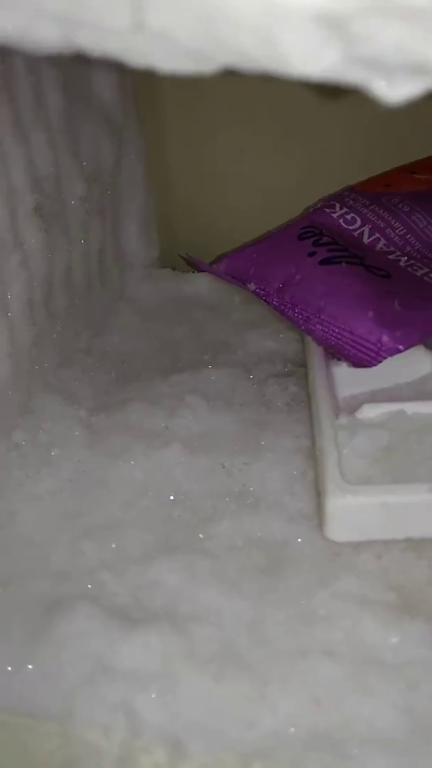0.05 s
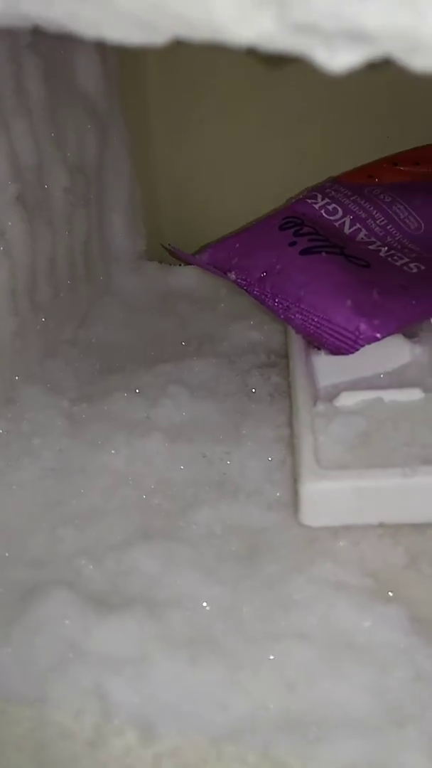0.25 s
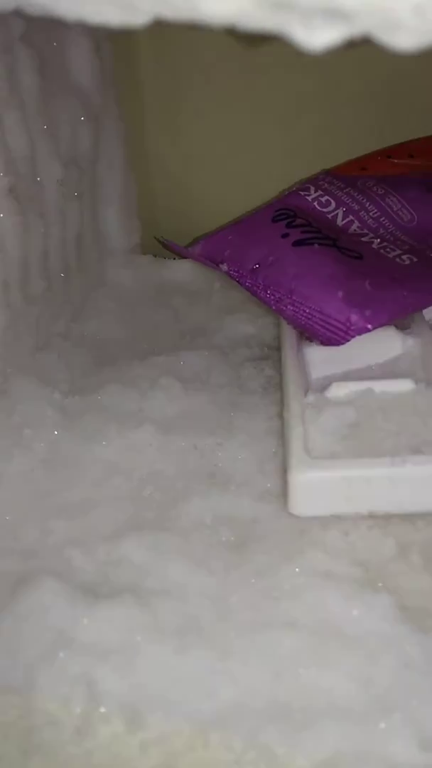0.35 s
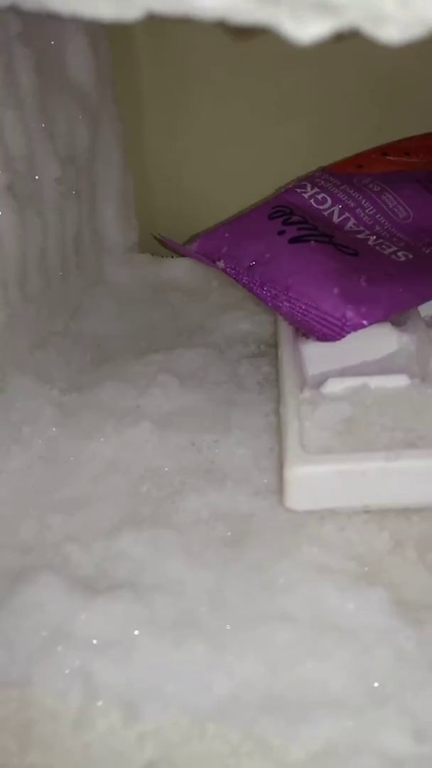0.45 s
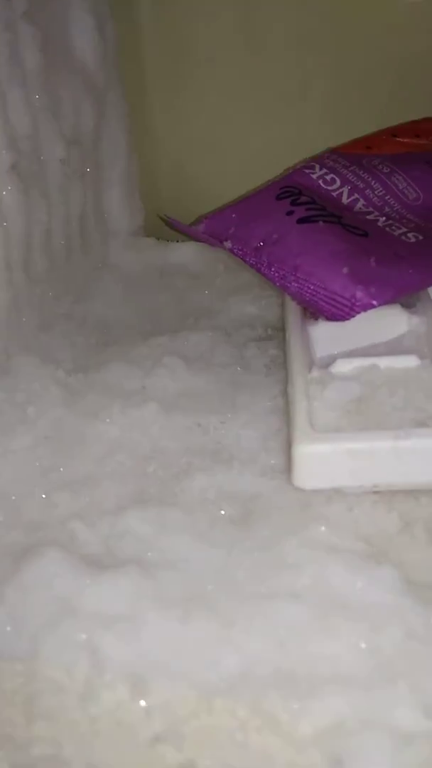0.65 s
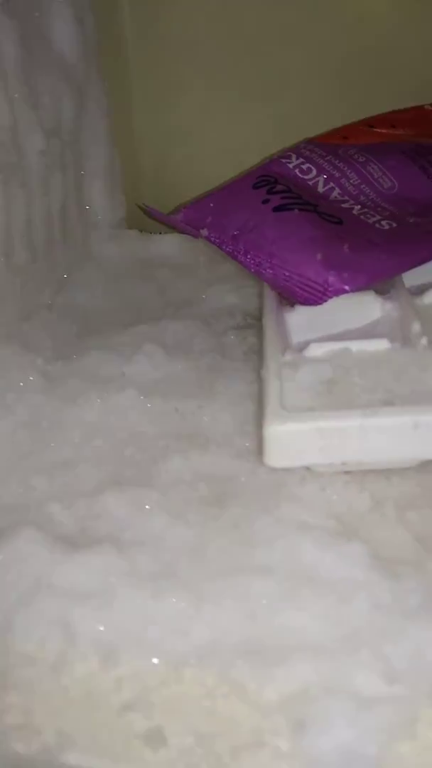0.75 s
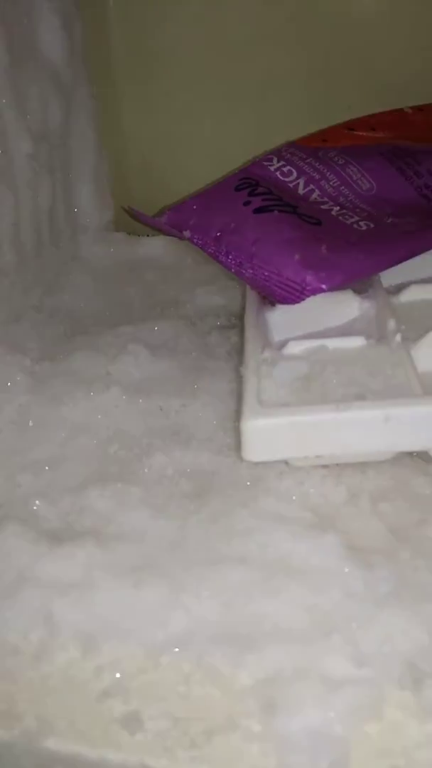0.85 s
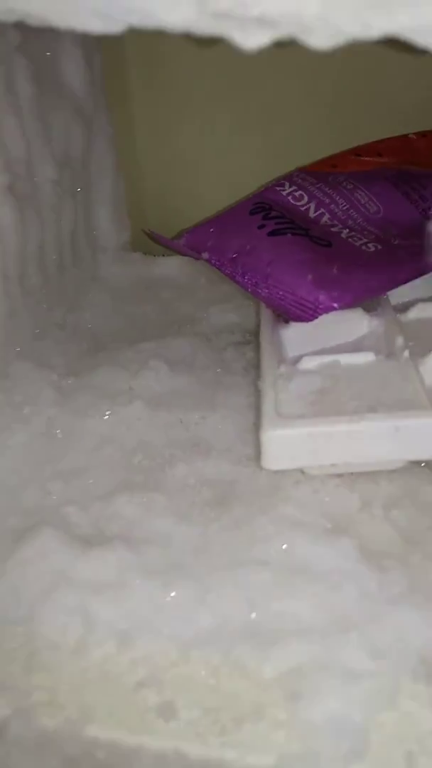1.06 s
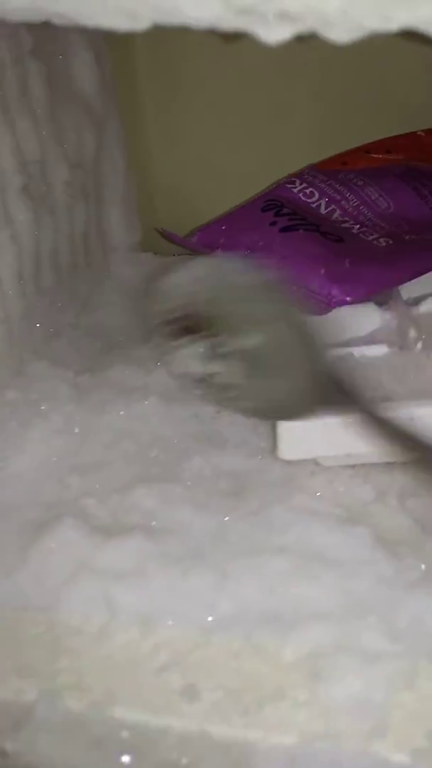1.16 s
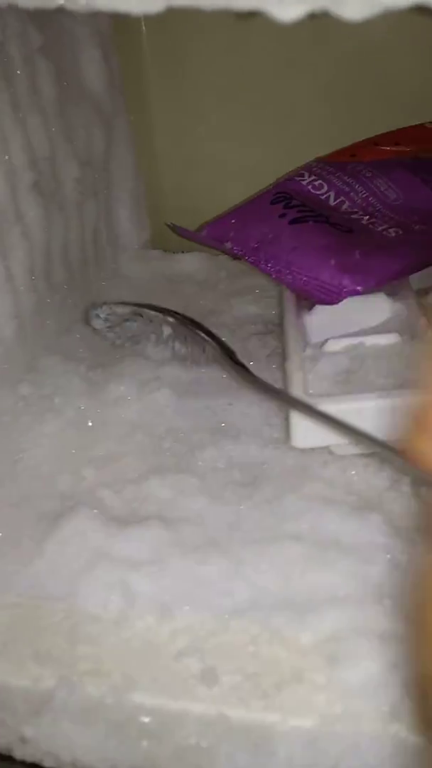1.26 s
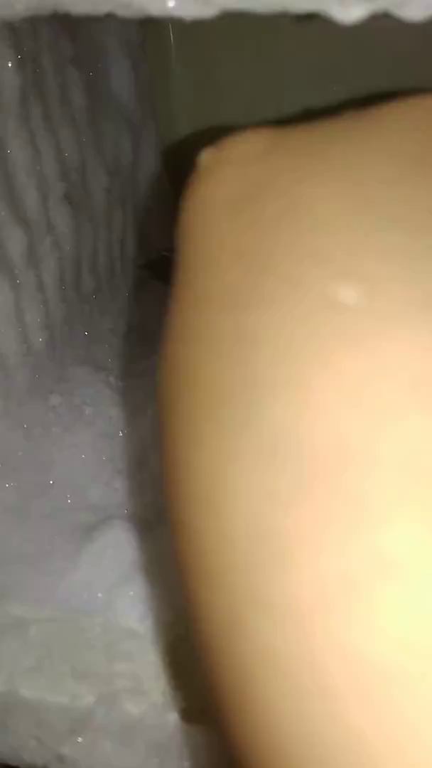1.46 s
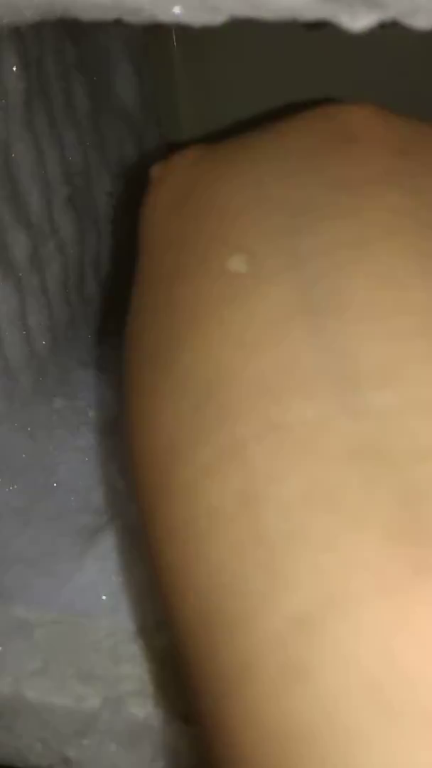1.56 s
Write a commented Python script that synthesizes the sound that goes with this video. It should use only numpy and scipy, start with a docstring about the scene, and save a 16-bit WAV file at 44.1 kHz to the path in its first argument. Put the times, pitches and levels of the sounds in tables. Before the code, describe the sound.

A metal spoon scrapes crumbling frost inside a freezer, knocking the hollow wall and thumping the cabinet. After a brief pause, the ice snaps with two sharp clicks and a soft bump follows. Heard close, over a faint compressor hum.

```python
"""Inside a freezer compartment, a metal spoon works at the frost, close by. Ice crystals crumble and squeak
under it. The spoon shakes and knocks the hollow liner (the inner wall) and makes the cabinet thump. The frost
snaps with two sharp clicks, then come a last soft bump and a faint, soft hiss. The compressor hums faintly
underneath."""
import sys
import numpy as np
from scipy import signal
from scipy.fft import rfft, irfft
from scipy.io import wavfile

SR = 44100
rng = np.random.default_rng(int(sys.argv[2]) if len(sys.argv) > 2 else 0)


def log_audio(samples):
    """Write samples as a 16-bit WAV file to the path given in sys.argv[1]."""
    # one column per channel
    frames = np.atleast_2d(samples).T
    # limit to full scale, then quantise
    limited = np.clip(frames, -1, 1)
    pcm = np.round(limited * 32767).astype(np.int16)
    wavfile.write(sys.argv[1], SR, pcm)


N = 70560
T = np.arange(N) / SR
FREQS = np.maximum(np.arange(N // 2 + 1) * SR / N, 1)

# How each sound swells and fades. Each row: time in seconds, level in dB.
SCRAPE_LEVELS = [(0, -64), (.08, -57), (.16, -57.5), (.185, -38.5), (.225, -42.5), (.25, -44),
                 (.295, -41.5), (.318, -80), (.335, -43), (.36, -62), (.40, -61), (.47, -50.5),
                 (.58, -48.5), (.62, -74), (.645, -52), (.71, -46.5), (.775, -59.5), (.805, -45),
                 (.835, -100), (1.0, -82.5), (1.1, -104), (1.33, -74.5), (1.37, -48.5), (1.42, -69),
                 (1.6, -100.5)]
DRAG_LEVELS = [(0, -53.5), (.1, -74.5), (.165, -47.5), (.185, -47), (.24, -45), (.29, -35), (.32, -49.5),
               (.39, -50), (.47, -50), (.52, -31.5), (.57, -38.5), (.69, -49), (.80, -43.5), (.88, -53.5),
               (1.0, -76), (1.34, -70.5), (1.39, -47), (1.6, -77)]
RUMBLE_LEVELS = [(0, -50.5), (.13, -85), (.21, -41), (.33, -37), (.40, -49.5), (.48, -52), (.53, -34.5),
                 (.68, -47.5), (.80, -36), (.92, -50.5), (1.05, -55.5), (1.34, -64), (1.38, -39),
                 (1.45, -46), (1.6, -66)]
HISS_LEVELS = [(1.38, -85), (1.43, -61), (1.5, -65.5), (1.56, -64.5), (1.6, -67)]
HUM_LEVELS = [(0, -70), (0.152, -82), (0.223, -56.5), (.95, -53.5), (1.1, -47), (1.218, -53), (1.33, -66),
              (1.498, -47), (1.6, -60)]

# The tone colour of each noise. Each row: frequency in Hz, relative level in dB.
SCRAPE_COLOUR = [(300, -6), (1000, 0.5), (1900, 3), (3500, 7), (6000, 3.5), (8000, 8), (12000, 5.5),
                 (15500, 1.5)]
DRAG_COLOUR = [(150, -8), (260, -1), (400, 5), (620, -3.5), (950, -14), (1300, -6), (2000, -10),
               (5000, -37.5)]
RUMBLE_COLOUR = [(20, -37), (45, -10.5), (75, -24.5), (110, 3.5), (170, 1), (215, -16), (400, -25),
                 (1000, -75.5)]
CRUNCH_COLOUR = [(200, 7.5), (500, -3.5), (1500, 3), (2600, -4), (4300, -6), (8000, -18.5), (16000, -35)]
CRACK_COLOUR = [(300, -6), (1000, -1), (2300, 7.5), (4800, -4), (6700, -4), (9500, -2.5), (13500, -7),
                (15200, -7.5), (17000, -27.5)]
TAIL_COLOUR = [(300, 10.5), (2500, 2.5), (6000, -8.5), (10000, -7), (15000, -19.5)]
HISS_COLOUR = [(1000, -2), (2600, -0.5), (3500, -9), (4500, 3), (6300, 4), (7400, -15), (10000, -27.5),
               (16000, -33)]
ROOM_COLOUR = [(20, 6.5), (100, 8.5), (280, -27), (550, 5.5), (900, -30.5), (3000, -19.5), (8000, -44.5),
               (16000, -50.5)]

# Knocks on the liner. Each row: start in seconds, level in dB, treble cut in Hz, bass cut in Hz.
KNOCKS = [(0.1745, -26.5, 794, 600), (.251, -23.5, 644, 450), (.272, -50, 3020, 400),
          (0.278, -23.5, 556, 357), (0.283, -29, 2660, 345), (0.29, -23, 510, 261), (.299, -22, 3900, 650),
          (0.479, -16.5, 720, 764), (0.4858, -16, 4600, 1340), (0.496, -11, 520, 294),
          (0.5035, -6.5, 2600, 540), (.726, -26.5, 596, 200), (.748, -29.5, 475, 220),
          (0.802, -36, 1980, 300), (1.357, -38, 642, 624), (1.398, -34, 4500, 1476)]
# The pitches the liner rings at, in Hz.
LINER_HZ = [340, 389, 485, 536, 602, 724, 795, 855, 986, 1098, 1266, 1321, 1590, 1693, 1891]
# One row for each of those pitches: level in dB, fade time (to fall 60 dB) in seconds.
LINER_RINGS = [(-20.5, 0.12), (-12.5, 0.17), (-16, 0.16), (-19.5, 0.072), (-15, 0.11), (-15.5, 0.11),
               (-23, 0.13), (-20, 0.16), (-24, 0.043), (-23.5, 0.15), (-16, 0.086), (-21.5, 0.08),
               (-16.5, 0.12), (-16, 0.09), (-17.5, 0.071)]
# The contact's clack and the cabinet's boom. Each row: pitch in Hz, level in dB, fade in seconds.
CLACK_TONES = [(391.1, 1, 0.055), (650, -6, 0.019), (1294, -8.5, 0.015), (1839, -3, 0.03)]
CABINET_TONES = [(62.4, -9, 0.16), (114.6, 9, 0.022), (127, -7, 0.27), (147.2, -4.5, 0.08), (167, 4, 0.15)]
# Cabinet thumps. Each row: start in seconds, level in dB.
THUMPS = [(0.293, -44), (0.5, -29), (0.7225, -23.5), (0.746, -53), (1.371, -36), (1.415, -31.5)]
# Frost cracks. Each row: start in seconds, level in dB, fade in seconds, bass cut in Hz,
# extra lean to the left in dB.
CRACKS = [(0.012, -38.5, 0.05, 2010, -1), (0.27, -25.5, 0.019, 1520, 4), (0.285, -26.5, 0.019, 1370, 5),
          (0.299, -29.5, 0.019, 935, 2), (.340, -29, 0.029, 1210, 1), (0.4863, -22, 0.011, 1300, 2),
          (0.504, -27, 0.012, 1015, 10), (0.525, -29.5, 0.015, 4000, -5), (0.58, -34.5, 0.027, 2000, -1),
          (0.638, -34.5, 0.015, 3330, 1), (.728, -24, 0.027, 3000, 0.5), (0.741, -40, 0.025, 5940, 16),
          (0.7504, -22.5, 0.019, 4050, 7), (0.752, -30, 0.027, 1500, 5.5), (0.789, -47.5, 0.036, 3020, 4),
          (0.81, -45, 0.02, 2500, 0), (0.8456, -43.5, 0.023, 3480, 10), (.906, -34.5, 0.03, 2500, 5.5),
          (1.172, -18, 0.028, 2720, -4), (1.22, -28.5, 0.039, 5600, 1), (1.247, -14.5, 0.033, 3700, -1),
          (1.251, -27.5, 0.043, 823, 0), (1.36, -38.5, 0.092, 5460, -13), (1.398, -40, 0.03, 3970, 1)]
# Where the cracks ring. Each row: frequency in Hz, width in Hz, boost in dB.
CRACK_PEAKS = [(2250, 100, -2), (3460, 300, 0.5), (6700, 230, 5), (7800, 2100, 5), (9930, 320, 2.5),
               (11800, 900, 4.5)]
# Pings of ice and spoon. Each row: start in seconds, pitch in Hz, level in dB, fade in seconds,
# pitch slide in Hz.
PINGS = [(.505, 8200, -57, 0.04, 7), (.731, 1830, -34.5, .04, 5.5), (.799, 4450, -43, 0.059, 3),
         (.801, 1832, -42.5, .07, 3), (.808, 5600, -41, 0.026, 0), (.906, 2870, -45.5, 0.059, 3),
         (.906, 6520, -39.5, 0.027, 0), (.906, 4980, -42, 0.028, 2), (1.172, 1950, -40.5, 0.16, 620),
         (1.173, 6280, -30.5, 0.057, -2.5), (1.172, 10490, -25, 0.034, -1), (1.22, 9530, -45.5, .035, 1),
         (1.248, 6650, -33, 0.024, 1.5), (1.398, 2470, -41, 0.041, 0), (1.365, 1726, -42.5, .04, 0),
         (1.399, 1635, -39, 0.049, 0)]
# Brief tones: squeaks of frost and short low pulses of the knocks.
# Each row: middle and length in seconds, pitch in Hz, level in dB.
BRIEF_TONES = [(.125, .09, 1930, -60), (.186, .018, 780, -41), (.205, .04, 590, -48),
               (.224, .034, 8250, -39), (.225, .035, 7200, -48), (.257, .014, 530, -38),
               (.29, .03, 395, -33), (.29, .035, 11600, -42), (.484, .007, 800, -31),
               (.4988, .004, 600, -15), (.529, .005, 5600, -31), (.744, .005, 7400, -35),
               (1.361, .011, 500, -40), (1.367, .01, 8280, -40), (1.369, .01, 11700, -46)]
# The compressor's faint steady tones. Each row: pitch in Hz, level in dB.
HUM_TONES = [(151, -86), (484.5, -71), (581.5, -95.5), (630, -74.5)]
# Where sounds sit between the ears. Each row: frequency in Hz, lean to the left in dB.
BALANCE = [(100, 4), (350, 0.5), (650, -4), (1300, 4.5), (3500, 12.5), (8000, 12.5), (13000, -1.5)]
CRACK_BALANCE = [(1000, 2), (2500, 7), (4500, 12), (8000, 8.5), (13000, 2)]
# Stereo width. Each row: frequency in Hz, level in dB of the part that differs between the sides.
WIDTH = [(100, -27), (500, 2), (1200, -0.5), (3000, -1), (14000, 1)]

LINER_LAG_S = 0.00018  # the right side hears the liner later


def scraping(bands=18, grains_per_s=30000):
    """Crystals crumble under the spoon, each ringing briefly at its own pitch."""
    crumbs = 0
    for hz in np.geomspace(700, 15000, bands):
        resonance = signal.iirpeak(hz, Q=13, fs=SR)
        crumbs += signal.lfilter(*resonance, grains(grains_per_s / bands) + 1e-18) / hz ** .25
    return level(SCRAPE_LEVELS) * from_db(2.5) * coloured(SCRAPE_COLOUR, crumbs)


def dragging():
    """Coarser slips shake the liner while the pressing spoon damps it, and the cabinet rumbles."""
    damped = cut(liner() * decay(0.45), 850, "low")
    slips = grains(per_s=500)[:1]
    shudder = from_db(-3.5) * normalise(signal.fftconvolve(slips, damped, axes=1)[:, :N])
    grit = from_db(-4.5) * coloured(DRAG_COLOUR)
    rumble = level(RUMBLE_LEVELS) * coloured(RUMBLE_COLOUR)
    return level(DRAG_LEVELS) * (shudder + grit) + rumble


def knocks():
    """Each knock is a clack, a crunch and the liner's ring; soft contacts are duller."""
    out = 0
    for start, db, treble_hz, bass_hz in KNOCKS:
        hit = ring(CLACK_TONES, LINER_LAG_S) + liner(spread_db=2)
        hit += from_db(-4.5) * coloured(CRUNCH_COLOUR) * decay(0.044)
        hit = cut(cut(hit, treble_hz, "low"), bass_hz, "high")
        out += from_db(db) * start_at(hit, start)
    return out


def liner(spread_db=0):
    """The hollow liner rings at many pitches; spread_db varies their levels at random."""
    tones = [(hz, db, fade) for hz, (db, fade) in zip(LINER_HZ, LINER_RINGS)]
    return ring(tones, LINER_LAG_S, spread_db)


def cracks(rise_s=0.00027):
    """Brittle frost snaps: each a short bright burst with a faint tail in the room."""
    out = 0
    for start, db, fade, bass_hz, left_db in CRACKS:
        burst = coloured(CRACK_COLOUR, balance=CRACK_BALANCE, peaks=CRACK_PEAKS)
        burst *= decay(fade) * pan(left_db)
        tail = from_db(-18) * coloured(TAIL_COLOUR, balance=CRACK_BALANCE) * decay(0.37)
        snap = (burst + tail) * rise(rise_s)
        snap = cut(cut(snap, bass_hz, "high"), bass_hz, "high")
        out += from_db(db) * start_at(wall_echoes(snap), start)
    return out


def thumps():
    """Soft pushes boom in the cabinet."""
    boom = cut(ring(CABINET_TONES), 307, "low")
    return sum(from_db(db) * start_at(boom, start) for start, db in THUMPS)


def pings(slide_s=0.012, rise_s=0.00043):
    """Hard ticks leave a short ring, whose pitch may slide."""
    out = 0
    for start, hz, db, fade, slide_hz in PINGS:
        pitch = hz + slide_hz * rise(slide_s)
        tone = np.sin(2 * np.pi * np.cumsum(pitch) / SR) * decay(fade) * rise(rise_s)
        out += from_db(db) * start_at(tone * place(hz), start)
    return out


def brief_tones(width_hz=43):
    """Wavering tones swell and vanish: squeaks of frost and short low pulses of the knocks."""
    out = 0
    for middle, length, hz, db in BRIEF_TONES:
        wander = np.cumsum(rng.standard_normal(N)) * np.sqrt(2 * np.pi * width_hz / SR)
        tone = np.sqrt(2) * np.sin(2 * np.pi * hz * T + wander)
        swell = np.exp(-np.minimum((2 * (T - middle) / length) ** 2, 20))
        out += from_db(db) * tone * swell * place(hz)
    return out


def hiss():
    """A faint, soft hiss at the end."""
    started = T > HISS_LEVELS[0][0]
    return level(HISS_LEVELS) * started * coloured(HISS_COLOUR)


def compressor(hum_hz=92.5):
    """The compressor's low hum swells and fades under faint steady tones."""
    hum = level(HUM_LEVELS) * np.sin(2 * np.pi * hum_hz * T)
    hum += sum(from_db(db) * np.sin(2 * np.pi * (hz * T + rng.random())) for hz, db in HUM_TONES)
    return np.sqrt(2) * hum * place(hum_hz)


def room_noise():
    """The room's faint, steady noise."""
    return from_db(-67.5) * coloured(ROOM_COLOUR)


def wall_echoes(x, count=6):
    """Echoes off the near walls boost some pitches and weaken others, differently on each side."""
    delays_s = rng.uniform(.0004, .004, (count, 2, 1))
    comb = 1 + from_db(-11) * np.exp(-2j * np.pi * FREQS * delays_s).sum(axis=0)
    comb /= np.sqrt(np.mean(abs(comb) ** 2, axis=1, keepdims=True))
    echoes = irfft(comb, N)[:, :SR // 20]
    return signal.fftconvolve(x, echoes, axes=1)[:, :N]


def grains(per_s, spread_db=3):
    """Tiny random breaks of uneven size, as two channels of clicks."""
    sizes = from_db(spread_db * np.minimum(rng.exponential(1, N), 4))
    return (rng.random(N) < per_s / SR) * sizes * rng.standard_normal((2, N))


def ring(tones, lag_s=0, spread_db=0):
    """A struck object rings as a sum of fading tones, lag_s later on the right."""
    t = np.maximum(T - np.array([[0], [lag_s]]), 0)
    out = 0
    for k, (hz, db, fade) in enumerate(tones):
        gain = (-1) ** k * from_db(db + spread_db * rng.normal())
        out += gain * place(hz) * np.sin(2 * np.pi * hz * t) * decay(fade)
    return out


def coloured(colour, source=None, balance=BALANCE, peaks=()):
    """Give white noise, or a two-channel source, a tone colour and a stereo spread."""
    mid, side = rfft(rng.standard_normal((2, N)) if source is None else source)
    pair = mid + side * from_db(at_hz(WIDTH, FREQS)) * [[1], [-1]]
    boost_db = sum(db / (1 + (2 * (FREQS - hz) / width) ** 2) for hz, width, db in peaks)
    shape = from_db(at_hz(colour, FREQS) + boost_db)
    return normalise(irfft(pair * shape * pan(at_hz(balance, FREQS)), N))


def from_db(db):
    """Turn decibels into a gain."""
    return 10 ** (np.asarray(db) / 20)


def normalise(x):
    """Scale a sound to an average power of one."""
    return x / np.sqrt(np.mean(x ** 2) + 1e-20)


def level(rows):
    """Join (seconds, dB) points into a gain over time."""
    return from_db(np.interp(T, *np.transpose(rows)))


def at_hz(rows, hz):
    """Read a table at any frequency, with octaves evenly spaced."""
    freqs, values = np.transpose(rows)
    return np.interp(np.log(hz), np.log(freqs), values)


def pan(left_db):
    """Left and right gains, with the left louder by left_db."""
    gains = from_db(np.array([[.5], [-.5]]) * left_db)
    return gains / np.sqrt(np.mean(gains ** 2, axis=0))


def place(hz):
    """Left and right gains for a tone of this pitch."""
    return pan(at_hz(BALANCE, hz))


def cut(x, hz, keep):
    """Keep the "low" or "high" side of hz and soften the rest."""
    return signal.sosfilt(signal.butter(2, hz, keep, fs=SR, output="sos"), x + 1e-18)


def rise(seconds):
    """Climb from 0 towards 1, about two thirds of the way in this time."""
    return 1 - np.exp(-T / seconds)


def decay(seconds):
    """Fade by 60 dB in this time."""
    return np.exp(-np.minimum(np.log(1000) * T / seconds, 100))


def start_at(x, seconds):
    """Delay a sound to its starting time."""
    return np.pad(x, ((0, 0), (int(seconds * SR), 0)))[:, :N]


def scene():
    """Add up the frost, the freezer's body and the quiet sounds behind them."""
    frost = wall_echoes(scraping()) + cracks() + pings()
    spoon_work = frost + brief_tones() + dragging() + knocks() + thumps()
    return spoon_work + hiss() + compressor() + room_noise()


def record(dry, cutoff_hz=15900):
    """Cut off the very highest treble steeply."""
    return signal.sosfilt(signal.ellip(10, .1, 90, cutoff_hz, fs=SR, output="sos"), dry)


dry = scene()
out = record(dry)
log_audio(out)
```